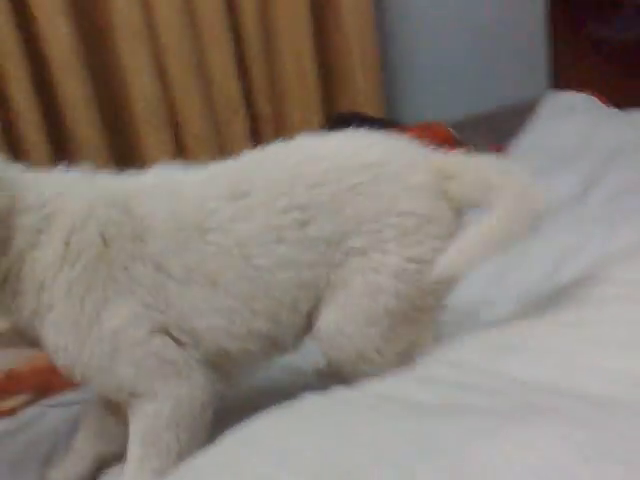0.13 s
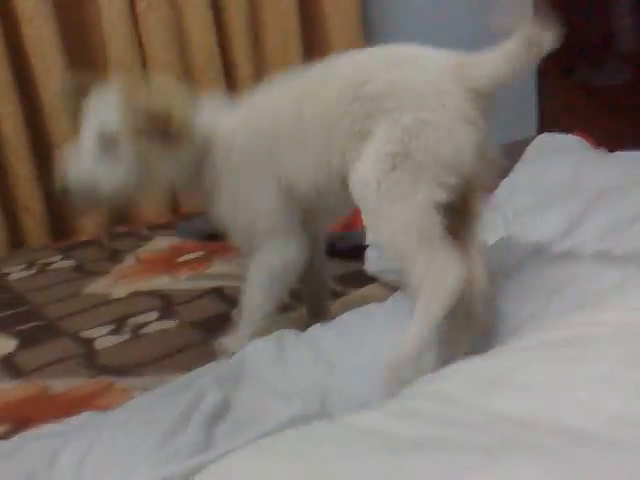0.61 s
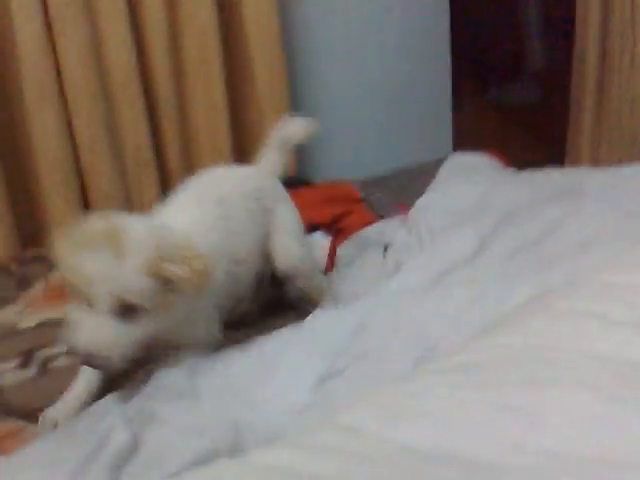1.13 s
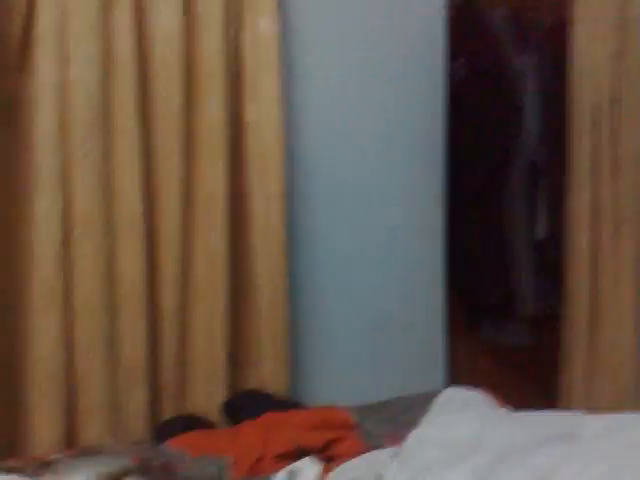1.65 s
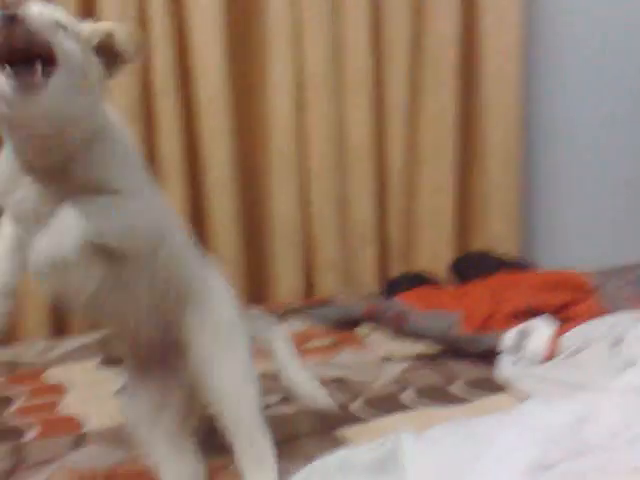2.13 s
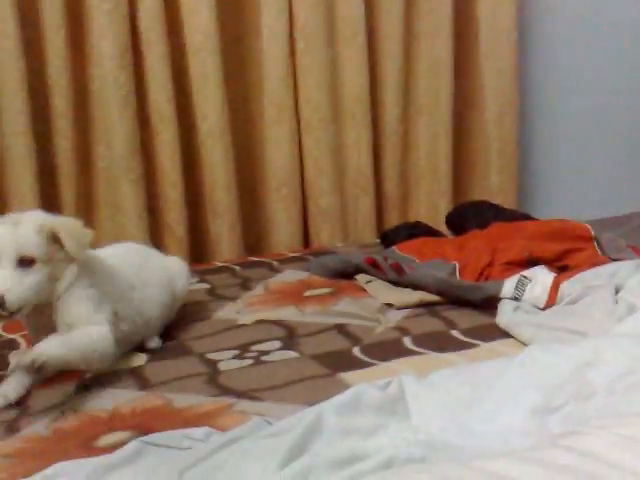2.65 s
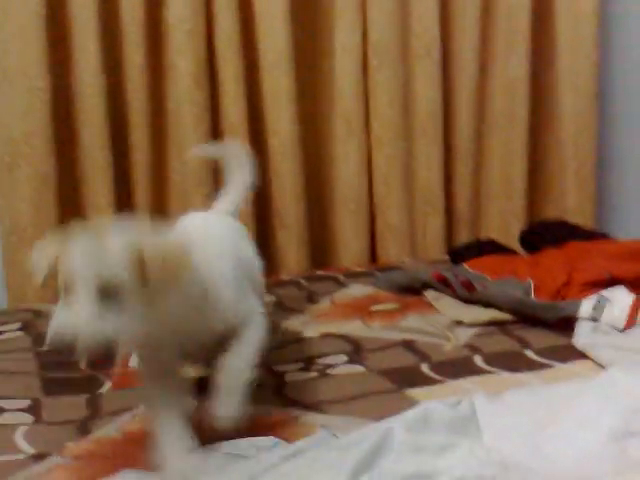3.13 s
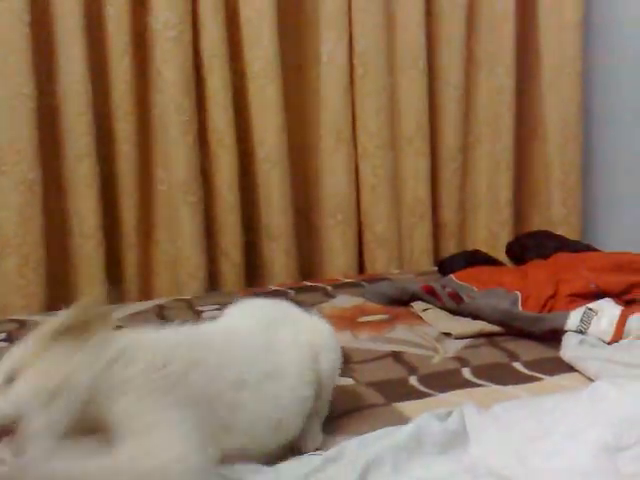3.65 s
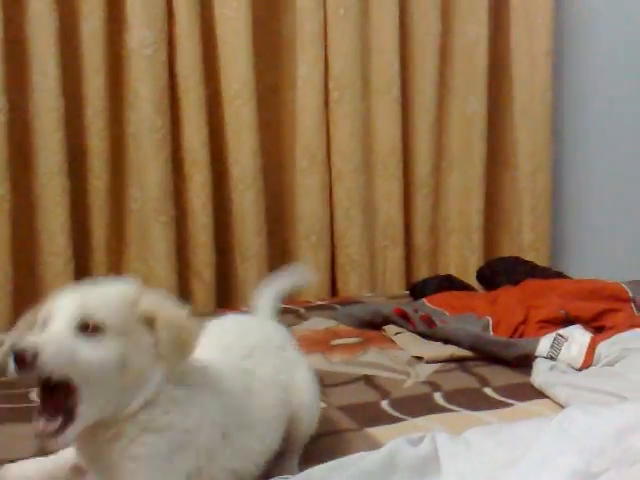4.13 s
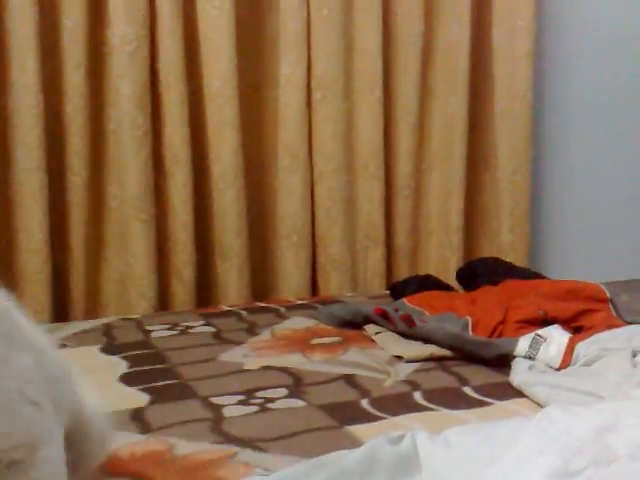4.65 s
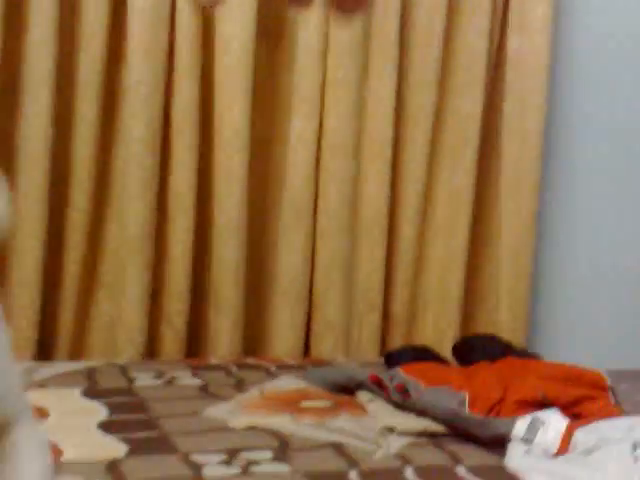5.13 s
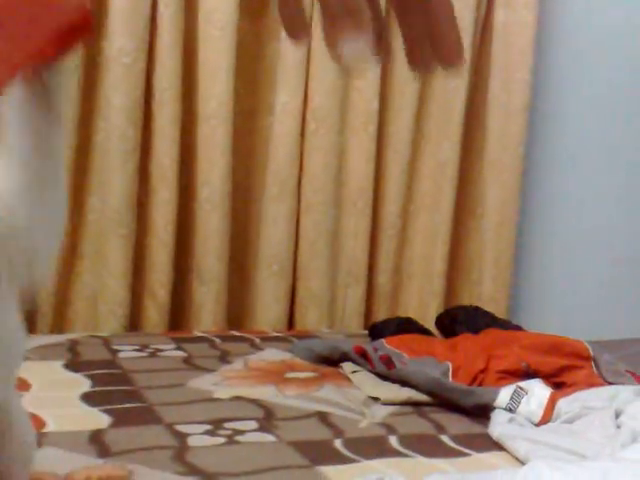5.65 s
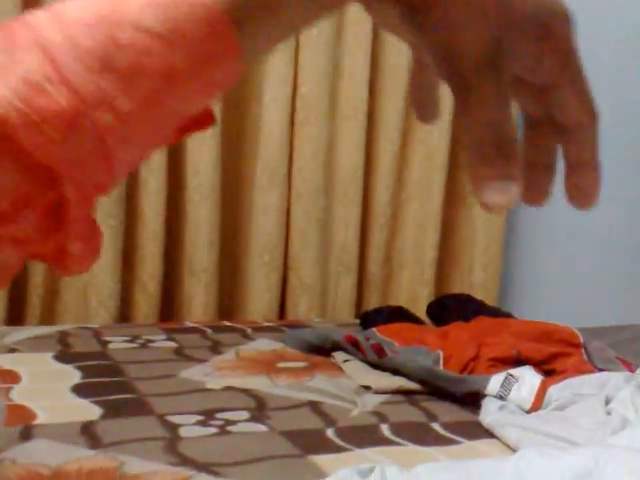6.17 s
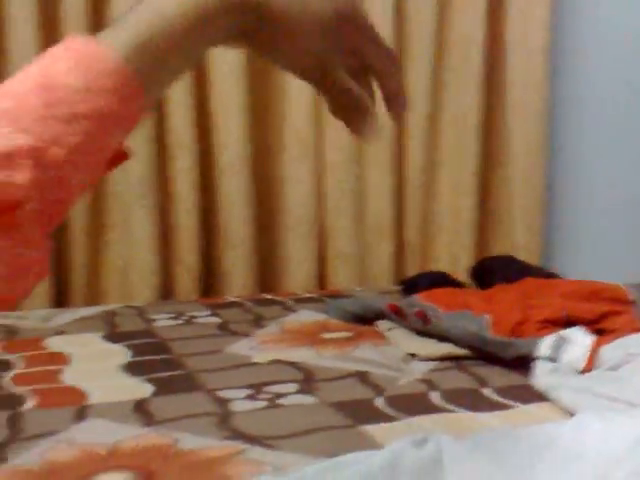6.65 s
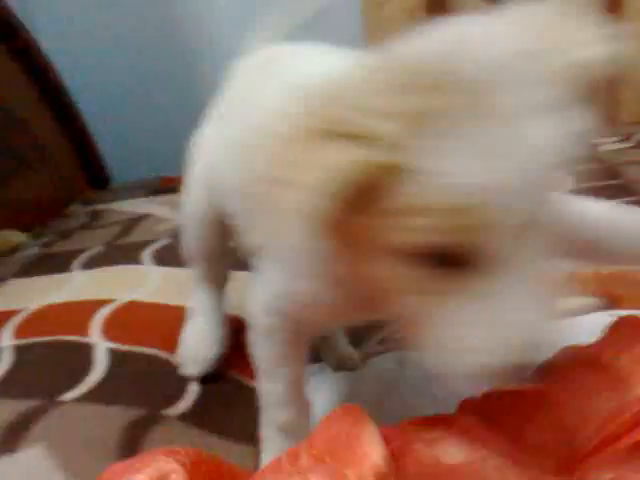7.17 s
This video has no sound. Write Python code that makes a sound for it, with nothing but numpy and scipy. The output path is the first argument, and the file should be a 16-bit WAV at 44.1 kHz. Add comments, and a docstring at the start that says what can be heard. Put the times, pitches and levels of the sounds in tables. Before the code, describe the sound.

Soft mattress thumps, small clicks and puppy snorts lead to a brief low growl and a high bark, followed by rough cloth rubbing and pops.

```python
"""On a bed in a small soft room, a puppy plays close to a phone. Pulsed vocal folds and resonances make
one low growl that breaks into a bark; shaped noise makes the pants and snorts; short damped rings make
the snaps of jaws and claws and the ticks of cloth threads, and decaying low modes the landings on the
mattress. Then cloth drags across the microphone in short strokes of grainy noise with pops. Rumble,
rustle, hum and hiss lie under it all."""
import sys
import numpy as np
from scipy import signal
from scipy.io import wavfile
from scipy.ndimage import uniform_filter1d

SR = 44100
rng = np.random.default_rng(int(sys.argv[2]) if len(sys.argv) > 2 else 0)


def wav_record(signal):
    """Record a signal, one row per channel, as 16-bit PCM in the file named by sys.argv[1]."""
    frames = np.transpose(np.atleast_2d(signal))
    bounded = np.clip(frames, -1, 1)
    # unit amplitude maps onto the largest positive 16-bit level
    quanta = np.round(bounded * 32767).astype(np.int16)
    wavfile.write(sys.argv[1], SR, quanta)


def attenuation_scalar(level_db):
    """Turn a level in dB into a linear amplitude multiplier (20 dB per decade)."""
    decades = np.asarray(level_db, float) / 20
    return 10 ** decades


N = 321136  # length in samples

# Course of the growl. Each row: time in seconds, effort in dB, mean pitch in Hz, roughness from 0 to 1,
# throat stretch as a factor on the upper chest resonances.
GROWL_COURSE = [(4.135, -52.5, 146.2, 0.07, 1.22), (4.152, -31.5, 145.1, 0.14, 1.08),
                (4.19, -31, 143.5, 0.48, 0.785), (4.224, -33.5, 142.1, 0.69, 0.737),
                (4.29, -29.5, 136.2, 0.44, 0.86), (4.35, -28, 135.4, 0.38, 0.766),
                (4.41, -29, 134.1, 0.32, 0.79), (4.44, -36, 132.6, 0.62, 1.07),
                (4.475, -32, 129.5, 0.18, 0.92), (4.535, -33, 127.2, .2, 0.79),
                (4.562, -35, 127.5, 0.28, 1.043), (4.587, -31.5, 149.4, 0.14, .7)]
# Chest resonances, heard through a shut mouth. Each row: centre in Hz, width in Hz, relative gain in dB.
CHEST_MODES = [(135, 60, -2), (245, 150, 1), (400, 170, -4), (600, 200, -13)]
# Mouth resonances of the breathy rasp. Each row: centre in Hz, width in Hz, relative gain in dB.
MOUTH_MODES = [(882, 740, 6), (1240, 1110, -11.5), (1850, 300, -23), (3564, 1410, -9.5), (5000, 1820, -22)]


def growl():
    """Source and filter: slow uneven pulses excite the chest, and breath noise rasps past the lips."""
    t, effort_db, hz, rough, stretch = columns(GROWL_COURSE)
    # strong-weak pairs stand out in the loud middle
    pairs_start_s, pairs_end_s, pairs_fade_s = 4.28, 4.42, 0.025
    paired = np.clip(np.minimum(t - pairs_start_s, pairs_end_s - t) / pairs_fade_s + 0.5, 0, 1)
    alternation = 0.35 + (1.0 - 0.35) * paired

    # the lips close briefly three times, then part for the bark
    lips_shut_s, shut_length_s, parting_s, parting_db_per_s = (4.14, 4.225, 4.545), 0.025, 4.565, 501.5
    closures = sum(np.exp(-((t - s) / shut_length_s) ** 2) for s in lips_shut_s)
    mouth_db = -14 - 14 * closures + parting_db_per_s * np.maximum(t - parting_s, 0)

    # the lowest chest resonance is full only in this span
    boom_start_s, boom_end_s, boom_fade_s, boom_off_db = 4.168, 4.43, 0.02, -7
    boom = np.clip(np.minimum(t - boom_start_s, boom_end_s - t) / boom_fade_s + 0.5, 0, 1)
    low_hz, low_width, low_db = CHEST_MODES[0]
    modes = [(low_hz, low_width, low_db + boom_off_db * (1 - boom))]
    modes += [(f * stretch, width, db) for f, width, db in CHEST_MODES[1:]]

    turns, strength, puffs = folds(hz, rough)
    halves = np.arange(2, 14)[:, None]  # orders counted in half harmonics
    odd = halves % 2
    lags = 0.2075 * odd  # in cycles: the weak pulse of a pair comes late
    lines = partials(turns - lags, hz, halves / 2, modes)
    lines = lines * np.where(odd, alternation, 1)  # pairs add half lines
    pulses = -lines.sum(0) / np.sqrt(1 + alternation ** 2) * strength
    chest = evened(pulses) + 0.68 * rough * evened(cavities(puffs, modes))
    rasp = attenuation_scalar(mouth_db) * evened(cavities(puffs, MOUTH_MODES))
    return t[0], attenuation_scalar(effort_db) * (chest + rasp)


# Course of the bark. Each row: time in seconds, effort in dB, mean pitch in Hz.
BARK_COURSE = [(4.576, -45.5, 314.3), (4.584, -32, 320), (4.589, -26, 326), (4.6, -24.5, 332.9),
               (4.612, -21, 337.2), (4.624, -21.5, 340.6), (4.638, -23, 328.3), (4.653, -28.5, 289.9),
               (4.669, -37.5, 240.2), (4.685, -49, 214.8)]
# Open throat resonances. Each row: centre in Hz, width in Hz, relative gain in dB.
THROAT_MODES = [(330, 577, 2.5), (656, 315, -16.5), (987.5, 220, 0), (1403.6, 144, 5), (1727, 254, -0.5)]
# Resonances of the rasp. Each row: centre in Hz, width in Hz, relative gain in dB.
RASP_MODES = [(3216, 1070, 6.5), (4455, 730, 5), (5764, 425, 5)]


def bark():
    """Source and filter: fast sharp pulses in an open throat; a jaw resonance fades as the jaws shut."""
    t, effort_db, hz = columns(BARK_COURSE)
    jaw_start_db, jaw_opens_db_per_s, jaw_open_db, jaw_shut_db = -25, 1501, -1.5, -17
    jaw_shuts_s, jaw_time_s = 4.617, 0.00184
    opening_db = np.minimum(jaw_start_db + jaw_opens_db_per_s * (t - t[0]), jaw_open_db)
    still_open = 1 / (1 + np.exp((t - jaw_shuts_s) / jaw_time_s))
    jaw_db = jaw_shut_db + (opening_db - jaw_shut_db) * still_open

    # the rasp swells, then eases
    rasp_top_s, rasp_top_db, rise_db_per_s, fall_db_per_s = 4.634, -14, 451, 250
    rasp_db = rasp_top_db - np.maximum(rise_db_per_s * (rasp_top_s - t), fall_db_per_s * (t - rasp_top_s))

    turns, strength, puffs = folds(hz, 0.1)
    orders = np.arange(1, 11)[:, None]
    full_pitch_hz = 325  # under this pitch the bark darkens
    top_hz = 2587 * np.minimum(hz / full_pitch_hz, 1) ** 1.5
    reach = 1 / (1 + (orders * hz / top_hz) ** 16)  # steep fall above top_hz
    lags = 0.0197 * orders  # in cycles: higher partials trail, so each pulse spreads
    lines = reach * partials(turns - lags, hz, orders, THROAT_MODES)
    voice = evened(lines.sum(0)) * strength
    pulses = evened((reach * np.cos(2 * np.pi * orders * turns)).sum(0))
    jaw = resonate(pulses + 0.4 * puffs, 2292, 343)  # rings on after each pulse
    voice += attenuation_scalar(jaw_db) * evened(jaw)
    air = 0.293 * evened(cavities(puffs, THROAT_MODES))
    air += attenuation_scalar(rasp_db) * evened(cavities(puffs, RASP_MODES))
    return t[0], attenuation_scalar(effort_db) * (voice + air)


def folds(hz, rough):
    """Self-oscillation of the vocal folds: jittered cycles, uneven strength and a puff of air in each."""
    wobble, shimmer = uniform_filter1d(rng.standard_normal((2, len(hz))), size=300, axis=1)
    turns = np.cumsum(hz * (1 + 0.14 * rough * evened(wobble))) / SR
    strength = attenuation_scalar(2.2 * rough * evened(shimmer))
    opening = 0.5 + np.exp(0.51 * (np.cos(2 * np.pi * turns) - 1))
    return turns, strength, evened(opening * rng.standard_normal(len(hz)))


def partials(turns, hz, orders, modes):
    """Fourier synthesis of sharp pulses: cosines in step, each as strong as the resonances pass it."""
    gain = sum(attenuation_scalar(db) / (1 + (2 * (orders * hz - f) / width) ** 2) for f, width, db in modes)
    return gain * np.cos(2 * np.pi * orders * turns)


# Puffs through the mouth. Each row: peak time in seconds, level in dB, time to rise 20 dB in seconds,
# time to fall 20 dB in seconds; the signs of both times are ignored.
PANT_PUFFS = [(.446, -59.5, 0.78, 0.36), (.94, -67, 0.48, -0.5), (1.35, -63, 0.23, -0.77),
              (1.472, -56, 0, 0.21), (1.564, -51.5, -0.04, 0.03), (1.625, -51.5, -0.0145, .12),
              (1.751, -41, -0.036, 0.0938), (1.86, -57.5, -0.35, 0.15), (1.99, -59, 0.08, 0.065),
              (2.174, -52, 0.02, -0.003), (2.44, -73, -0.27, -0.06), (2.485, -59.5, -0.43, 0.12),
              (2.533, -50, -0.03, 0.1353), (3.347, -44.5, 0.018, 0.09), (3.379, -32, 0.0124, 0.1159),
              (3.58, -63, 0.23, 0.32), (3.7, -58, 0.245, 0.11), (3.902, -46.5, 0.0177, 0.1157),
              (3.962, -46.5, 0.03, 0.0448), (3.988, -41.5, .03, 0.0737), (5.004, -62, 0.4, -0.87),
              (5.151, -54, -0.05, -0.24), (5.235, -51, -0.18, .06), (6.98, -46.5, 0.1855, -0.08),
              (7.108, -48, -0.03, 0.07)]
# Snorts and sniffs through the nose. Each row: time of full flow in seconds, level in dB, hold in seconds,
# time to fall 20 dB in seconds, fine hiss in dB against the level.
SNORT_PUFFS = [(0.437, -68.5, 0.056, -0.77, -4.5), (1.322, -66, 0.0079, 0.87, -6.5),
               (1.75, -37, 0.0502, 0.0393, -1.5), (1.861, -61.5, .001, 0.34, -10),
               (1.989, -51, .032, 0.01, -6.5), (2.127, -60, 0.021, 0.02, -4.5),
               (2.148, -53, 0.0339, 0.03, -5), (2.47, -57.5, 0.0185, 0.15, -2.4),
               (2.525, -57.5, 0.039, 0.197, -7), (3.336, -49.5, 0.0122, 0.0654, -13.5),
               (3.375, -48, .004, .035, -6), (3.432, -64, 0.041, 0.38, -4), (3.62, -61, .135, .04, 8),
               (3.893, -61.5, .001, 0.27, -10.5), (4.915, -68.5, 0.068, 0.53, 2),
               (5.196, -43, .022, .06, -7), (5.216, -35, 0.0118, 0.0536, -3),
               (6.972, -54.5, 0.0103, 0.08, -3.5), (7.087, -60.5, 0.025, -0.57, -4.5)]
# Mouth noise. Each row: frequency in Hz, relative density in dB per Hz.
PANT_SPECTRUM = [(410, -57), (700, -14.5), (1290, 0.5), (1430, 1.5), (1550, 0.5), (1720, 0.5), (2400, -2),
                 (3010, -25), (8000, -44), (10400, -73.5), (17600, -120)]
# Nose noise. Each row: frequency in Hz, relative density in dB per Hz.
SNORT_SPECTRUM = [(650, -51), (1100, -34), (1270, -15.5), (1660, -7), (1980, -4), (3780, .5), (5000, -8),
                  (6500, -39), (11000, -120)]
# Fine hiss of the nostrils. Each row: frequency in Hz, relative density in dB per Hz.
NOSTRIL_SPECTRUM = [(2940, -34.5), (5000, 0), (6160, 1.5), (7300, -7.5), (11900, -7.5), (12900, -9),
                    (15500, -13.5)]


def breaths():
    """Turbulence: air hisses through the mouth cavity and, brighter, through the nose."""
    powers = np.zeros((3, N))  # mouth, nose, nostril hiss
    leak_db = np.array([[0], [-17.5], [-26.5]])  # the last two leak through the nose
    for s, level_db, rise, fall in PANT_PUFFS:
        powers += attenuation_scalar(leak_db) ** 2 * puff(s, level_db, rise, 0, fall)
    for s, level_db, hold, fall, hiss_db in SNORT_PUFFS:
        rise = 0.2 * fall
        flow = puff(s, level_db, rise, hold, fall)
        # the hiss peaks in mid-hold
        peak = puff(s + hold / 2, level_db + hiss_db, 1.5 * hold + rise, 0, 0.75 * (hold + fall))
        powers[1:] += flow, np.minimum(peak, 10 * flow)
    mouth = noise(PANT_SPECTRUM, 1.8, 1.6, size=512)
    nose = noise(SNORT_SPECTRUM, 3.2, 0.55, size=512)
    nostrils = noise(NOSTRIL_SPECTRUM, 3.05, 0.4, size=256)
    return (np.sqrt(powers) * [mouth, nose, nostrils]).sum(0)


def puff(s, level_db, rise, hold, fall):
    """Exponential growth and decay of power: 20 dB per rise or fall time, about a level hold."""
    t = np.arange(N) / SR - s
    below = np.maximum(-t / abs(rise), (t - hold) / abs(fall))
    return attenuation_scalar(level_db - 20 * np.maximum(below, 0)) ** 2


# Snaps of jaws and claws, and ticks of cloth threads. Each row: start in seconds, ring level in dB,
# ring frequency in Hz, crack in dB against the ring before a 4 dB lift, crack frequency in Hz.
SNAPS_AND_TICKS = [(0.4236, -54.5, 2198, -1, 4482), (0.5107, -54, 2000, -4.5, 5000),
                   (1.34, -46.5, 2274, -15.5, 5000), (1.5195, -51, 1980, -12, 4500),
                   (1.5381, -48.5, 2093, -13.5, 5500), (1.6158, -31.5, 1455, -4, 426),
                   (2.172, -43, 1710, -9.5, 3500), (2.337, -26.5, 2170, -15, 4250),
                   (2.4754, -25, 2460, -5.5, 10500), (2.523, -46, 1500, 0.5, 700),
                   (3.3325, -33.5, 1907, -3, 4040), (3.3717, -10, 1752, -35, 5000),
                   (3.664, -44, 1210, -8.5, 600), (3.7455, -49, 2200, -6.5, 3500),
                   (3.7048, -35, 2215, -8, 5310), (3.8611, -47.5, 2170, -8, 4730),
                   (3.899, -33.5, 1765, -24, 3600), (3.9393, -39, 1700, -17, 5200),
                   (4.676, -52, 2300, 2, 5780), (5.1364, -35, 1495, -24, 4000),
                   (5.1508, -36, 1525, -20, 4000), (6.191, -40.5, 1240, -9, 8000),
                   (6.205, -50.5, 1500, -1, 6500), (6.9205, -32, 1960, -17, 4050),
                   (6.949, -28.5, 1376, -21, 4017), (6.9672, -26.5, 1790, -38, 4000),
                   (6.983, -26.5, 1850, -25, 3900), (6.708, -40.5, 1300, -10, 3500),
                   (6.7305, -32.5, 900, -10.5, 2800), (7.0355, -36.5, 800, -12, 2500),
                   (7.0564, -28, 2015, -17, 4452), (7.117, -35.5, 1775, -17, 4200)]


def snaps_and_ticks():
    """Impulse response of a damped resonance: a cycle or two, a crack, a push below and one near echo."""
    out, t = np.zeros(N), np.arange(700) / SR
    soft_rise_s, hard_rise_s, hard_db = 0.000772, 0.000341, -30  # hard ones are shorter
    cracks = rng.standard_normal((len(SNAPS_AND_TICKS), len(t)))
    for (s, ring_db, hz, crack_db, crack_hz), crack in zip(SNAPS_AND_TICKS, cracks):
        rise = hard_rise_s + (soft_rise_s - hard_rise_s) / (1 + np.exp(ring_db - hard_db))
        swell = t / rise * np.exp(1 - t / rise)
        sound = swell * np.sin(2 * np.pi * hz * t)
        sound += attenuation_scalar(crack_db + 4) * swell * evened(resonate(crack, crack_hz, 0.602 * crack_hz))
        push = np.exp(-t / 0.00172) * np.sin(2 * np.pi * 450 * t)
        push_db = -43 + 0.473 * (ring_db + 38)  # grows more slowly than the ring
        sound = attenuation_scalar(ring_db) * sound - attenuation_scalar(push_db) * push
        add(out, s, sound)
        add(out, s + 0.0027, attenuation_scalar(-9) * sound)
    return out


# Paws landing. Each row: start in seconds, knock in dB before an 8 dB cut, mattress ring in dB,
# final ring frequency in Hz, ring decay by 60 dB in seconds.
PAW_LANDINGS = [(0.201, -33, -44.5, 108.2, 0.165), (0.926, -43, -55.5, 136.4, 0.088),
                (1.109, -45, -49, 69.1, 0.36), (1.19, -40.5, -46, 110.5, 0.096),
                (1.255, -33.5, -37, 78.2, 0.224), (1.526, -42.5, -39.5, 62.5, 0.139),
                (1.641, -31.5, -38, 100.2, 0.185), (2.521, -30, -26, 77.6, 0.299),
                (3.143, -32, -34, 79.86, 0.306), (3.346, -29, -51.5, 109.6, 0.176),
                (3.45, -36.5, -50.5, 59.7, 0.23), (3.518, -36, -44, 69, 0.4),
                (3.573, -34, -36, 61.25, 0.097), (3.913, -30.5, -33, 59.7, 0.177),
                (4.412, -47, -31, 41.3, 0.149), (4.86, -34.5, -39.5, 109, 0.0615)]


def landings():
    """Dispersion of bending waves in the bed: high ripples come first, then the low ring swells unevenly."""
    out, t = np.zeros(N), np.arange(SR // 2) / SR
    knocks = rng.standard_normal((len(PAW_LANDINGS), len(t)))
    for (s, knock_db, ring_db, hz, t60), knock in zip(PAW_LANDINGS, knocks):
        ripple_hz = 200 + 400 * np.exp(-t / 0.00278)
        ripples = evened(resonate(knock, ripple_hz, 293)) * attenuation_scalar(-60 * t / 0.21) * np.minimum(t / 0.00043, 1)
        turns = np.cumsum(hz * (1 + 0.952 * np.exp(-t / 0.01526))) / SR  # the pitch glides down
        ring = np.sin(2 * np.pi * turns) + 0.434 * evened(resonate(knock, hz, 42.2))
        # a second, shorter mode
        ring += attenuation_scalar(-1 - 60 * t / 0.282) * evened(resonate(knock, 1.865 * hz, 33.5))
        swell = (1 - np.exp(-(t / 0.0382) ** 2)) * attenuation_scalar(-60 * t / t60)
        add(out, s, attenuation_scalar(knock_db - 8.0) * ripples + attenuation_scalar(ring_db) * swell / swell.max() * ring)
    return out


# Strokes of cloth over the microphone. Each row: peak time in seconds, level in dB,
# length scale in seconds, fine hiss in dB against the level.
CLOTH_STROKES = [(5.459, -42.5, 0.0337, -24.5), (5.534, -43.5, 0.0339, -29), (5.571, -39.5, 0.018, -24.5),
                 (5.712, -45, 0.0372, -17.5), (5.733, -38.5, 0.0161, -25.5), (5.77, -46.5, 0.026, -30),
                 (5.871, -41.5, 0.0205, -28), (5.918, -43, 0.0152, -29), (5.965, -50, 0.0545, -24.5),
                 (6.04, -39.5, 0.0383, -20), (6.091, -55, 0.095, -13), (6.214, -38.5, 0.0304, -10.5),
                 (6.285, -29.5, 0.01893, -11), (6.36, -33.5, 0.0325, -18), (6.45, -49.5, 0.048, -8),
                 (6.52, -36, 0.0373, -12), (6.585, -43, 0.0308, -14), (6.617, -46, 0.048, -24),
                 (6.675, -46.5, 0.0076, -24), (6.744, -34.5, 0.0328, -16), (6.817, -44, 0.0266, -17.5),
                 (6.884, -48, 0.037, -14.5), (7.018, -42.5, 0.05, -31), (7.09, -43, 0.0442, -14.5),
                 (7.167, -44.5, 0.02115, -25.5), (7.263, -47.5, 0.0213, -24)]
# Pops as the cloth lets go and the membrane is sucked out once. Each row: time in seconds,
# depth in dB before the rebound is mixed in, width scale in seconds.
MEMBRANE_POPS = [(5.723, -22, 0.00111), (5.738, -26.5, 0.00075), (6.289, -13.5, 0.00276),
                 (6.496, -22.5, 0.0018), (6.587, -23.5, 0.00284), (6.675, -31, 0.00098),
                 (7.134, -25, 0.00111), (7.265, -21.5, 0.00336)]
# Body of the drag. Each row: frequency in Hz, relative density in dB per Hz.
DRAG_SPECTRUM = [(200, -3.5), (400, 3.5), (1000, -4.5), (2500, -11), (5000, -22), (9000, -35.5)]
# Bass of the drag. Each row: frequency in Hz, relative density in dB per Hz.
DRAG_BASS_SPECTRUM = [(30, 14), (70, 10), (150, 10.5), (350, 3.5), (600, -42)]
# Fine hiss of the drag. Each row: frequency in Hz, relative density in dB per Hz.
DRAG_TREBLE_SPECTRUM = [(2000, -20), (4000, 0), (6500, -3), (9000, -9), (12000, -11), (15500, -19)]


def cloth():
    """Dry friction: each stroke swells and stops, and threads catch, so the noise is grainy."""
    t, levels, pops = np.arange(N) / SR, np.zeros((3, N)), np.zeros(N)
    for s, level_db, length, treble_db in CLOTH_STROKES:
        bass_db = -1 + 0.536 * (level_db + 41)  # harder strokes thump more
        shape = 1 / np.cosh(2.2 * (t - s) / length * np.where(t > s, 1.2, 0.9))
        levels += attenuation_scalar(level_db + np.array([[0], [bass_db], [treble_db]])) * shape
    for s, depth_db, width in MEMBRANE_POPS:
        u = (t - s) / width
        rebound = 0.37 * np.exp(-((u - 2.6) / 3.1) ** 2)  # slower than the dip
        pops -= attenuation_scalar(depth_db) * (np.exp(-u ** 2) - rebound)
    body = noise(DRAG_SPECTRUM, 1.5, 2.2, size=512)
    bass = noise(DRAG_BASS_SPECTRUM, 1.5, 1.5, size=1024)
    treble = noise(DRAG_TREBLE_SPECTRUM, 1.5, 2.6, size=256)
    return (levels * [body, bass, treble]).sum(0) + attenuation_scalar(-13) * levels[0] * crackle() + pops


def crackle():
    """Poisson process of threads catching: sparse uneven ticks, each a short dull burst; rms 1."""
    ticks_per_s, spread_db, decay_s = 300, 4, 0.0008
    sizes = attenuation_scalar(spread_db * np.minimum(rng.exponential(1, N), 4))
    ticks = sizes * (rng.random(N) < ticks_per_s / SR)
    swell = signal.lfilter([1], [1, -np.exp(-1 / (decay_s * SR))], ticks)
    return evened(swell * resonate(rng.standard_normal(N), 1610, 2270))


# The mattress rocking under the puppy and the hand. Each row: time in seconds, level in dB.
ROCKING_LEVELS = [(0.0, -61), (0.45, -62), (0.64, -71.5), (1.0, -54), (1.78, -50), (1.97, -60.5),
                  (2.55, -56.5), (2.7, -44.5), (2.9, -53), (3.5, -43), (3.87, -46.5), (3.96, -38.5),
                  (4.12, -45.5), (5.06, -51.5), (5.19, -42), (5.33, -45), (5.76, -37.5), (5.9, -41.5),
                  (6.04, -34.5), (6.3, -47.5), (6.42, -41), (7.19, -40.5), (7.28, -64.5)]
# Bedding sliding. Each row: time in seconds, level in dB.
SLIDING_LEVELS = [(0.0, -61.5), (0.5, -60.5), (0.97, -70), (1.32, -75.5), (1.5, -52.5), (1.97, -53.5),
                  (2.26, -70.5), (2.57, -52.5), (2.7, -63.5), (3.29, -66), (3.4, -55.5), (3.87, -52.5),
                  (3.96, -43.5), (4.12, -55), (4.9, -48), (5.06, -58.5), (5.19, -43.5), (5.33, -51),
                  (5.67, -49.5), (5.76, -39.5), (5.9, -48), (6.34, -41.5), (6.56, -57), (6.82, -43.5),
                  (7.19, -45.5), (7.28, -72.5)]
# Rumble of the mattress. Each row: frequency in Hz, relative density in dB per Hz.
RUMBLE_SPECTRUM = [(15, -8), (30, 0.5), (50, -4), (90, -13), (140, -11), (250, -79)]
# Rustle of the bedding. Each row: frequency in Hz, relative density in dB per Hz.
RUSTLE_SPECTRUM = [(60, -15), (150, 1.5), (400, -9), (1000, -16), (2500, -26), (6000, -37.5),
                   (15500, -52.5)]


def shifting():
    """Amplitude-modulated noise: bed and hand on the phone never rest, with lumpy rumble and soft rustle."""
    t = np.arange(N) / SR
    rocking_db = np.interp(t, *np.transpose(ROCKING_LEVELS))
    sliding_db = np.interp(t, *np.transpose(SLIDING_LEVELS))
    rumble = attenuation_scalar(rocking_db) * noise(RUMBLE_SPECTRUM, 1.5, 0, size=2048)
    return rumble + attenuation_scalar(sliding_db) * noise(RUSTLE_SPECTRUM, 2.93, 2.89)


# Decay of the small soft room. Each row: frequency in Hz, time to fall 60 dB in seconds.
ROOM_DECAY = [(150, 0.49), (400, 0.317), (1000, 0.311), (3000, 0.34), (8000, 0.178)]


def room(x):
    """Diffuse reverberation: sparse taps of random sign, each band dying at its own speed."""
    taps = np.zeros(SR // 2)
    at = np.arange(300, len(taps) - 20, 20)
    taps[at + rng.integers(0, 20, len(at))] = rng.choice([-1., 1.], len(at))
    hz, t, z = signal.stft(taps, SR, nperseg=256)
    decay = attenuation_scalar(-60 * t / read(ROOM_DECAY, hz)[:, None])
    tail = signal.istft(z * decay, SR, nperseg=256)[1]
    return signal.fftconvolve(x, tail / np.linalg.norm(tail))[:N]


def hum():
    """Narrow-band noise: a low hum whose strength wavers."""
    return attenuation_scalar(-60) * evened(resonate(rng.standard_normal(N), 47, 11))


# Hiss of the microphone. Each row: frequency in Hz, relative density in dB per Hz.
HISS_SPECTRUM = [(35, -21.5), (60, 0), (152, -2), (306, -9.5), (404, -13), (644, -13.5), (707, -16.5),
                 (892, -20), (2010, -23), (2660, -23), (8320, -31.5), (13900, -30.5), (15600, -28)]


def hiss():
    """Stationary random noise: the nearly steady coloured hiss of the microphone."""
    return attenuation_scalar(-57) * noise(HISS_SPECTRUM, 0.85, 0.22)


def noise(spectrum, patchy_db, grainy_db, size=1024):
    """Spectral shaping of noise to rms 1, with drifting patches and a fast flutter shared by all bands."""
    frames, hz = 4 * N // size + 5, np.fft.rfftfreq(size, 1 / SR)
    a, b, patches = rng.standard_normal((frames, len(hz), 3)).T
    patches = uniform_filter1d(patches, size=10, axis=0)  # over frequency
    patches = evened(uniform_filter1d(patches, size=6, axis=1))  # over time
    z = (a + 1j * b) * attenuation_scalar(read(spectrum, hz)[:, None] + patchy_db * patches)
    coloured = signal.istft(z, nperseg=size, noverlap=3 * size // 4)[1][:N]
    flutter = evened(uniform_filter1d(rng.standard_normal(N), size=130))
    return evened(coloured * attenuation_scalar(grainy_db * flutter))


def resonate(x, hz, width):
    """Heterodyne resonance of gain 1 that follows hz: shift down, smooth twice, shift back."""
    turn = np.exp(2j * np.pi * np.cumsum(hz * np.ones(len(x))) / SR)
    r = np.exp(-np.pi * width / SR)
    smooth = signal.lfilter([(1 - r) ** 2], [1, -2 * r, r * r], x / turn + 1e-18)
    return 2 * (turn * smooth).real


def cavities(x, modes):
    """Modal superposition: the input through a sum of resonances."""
    return sum(attenuation_scalar(db) * resonate(x, hz, width) for hz, width, db in modes)


def evened(x):
    """Normalisation of mean power: scales to rms 1."""
    return x / np.sqrt(np.mean(x ** 2) + 1e-20)


def read(points, hz):
    """Logarithmic interpolation: the value of a (Hz, value) table at hz."""
    f, value = np.transpose(points)
    return np.interp(np.log(hz + 1), np.log(f + 1), value)


def columns(rows):
    """Linear interpolation: time and every column of a curve, sample by sample."""
    s, *values = np.transpose(rows)
    t = np.arange(s[0], s[-1], 1 / SR)
    return [t] + [np.interp(t, s, v) for v in values]


def add(mix, s, sound):
    """Linear superposition: adds a sound into the mix at time s."""
    part = mix[round(s * SR):][:len(sound)]
    part += sound[:len(part)]


def scene():
    """Direct and reverberant sound: voice, snaps and ticks fill the room; the rest is close and dry."""
    voice = np.zeros(N)
    add(voice, *growl())
    add(voice, *bark())
    clicks = snaps_and_ticks()
    wet = room(attenuation_scalar(-11.0) * voice + attenuation_scalar(-28) * clicks)
    near = voice + clicks + breaths() + landings() + cloth()
    return (near + wet + shifting() + hum() + hiss())[None]


def band_limit(x):
    """A steep low-pass at the top of the band."""
    return signal.sosfilt(signal.butter(12, 15750, fs=SR, output="sos"), x)


def record(dry):
    """Linear-phase low-pass filtering: the band limit at 15850 Hz."""
    low_pass = signal.firwin(511, 15850, window=("kaiser", 9), fs=SR)
    mix = signal.oaconvolve(dry, low_pass[None], "same")
    return band_limit(mix)


dry = scene()
out = record(dry)
wav_record(out)
```